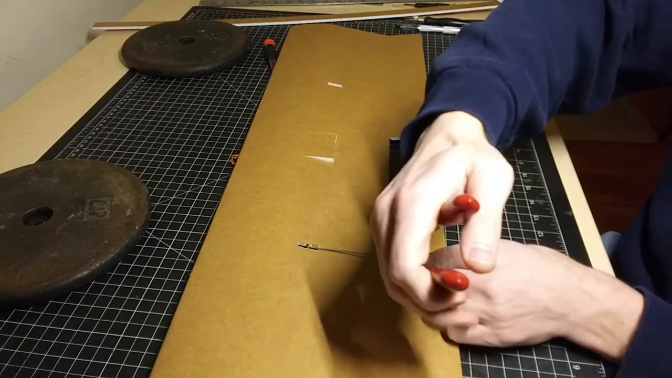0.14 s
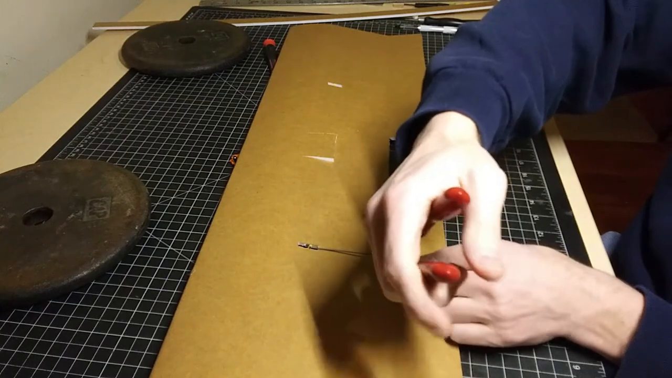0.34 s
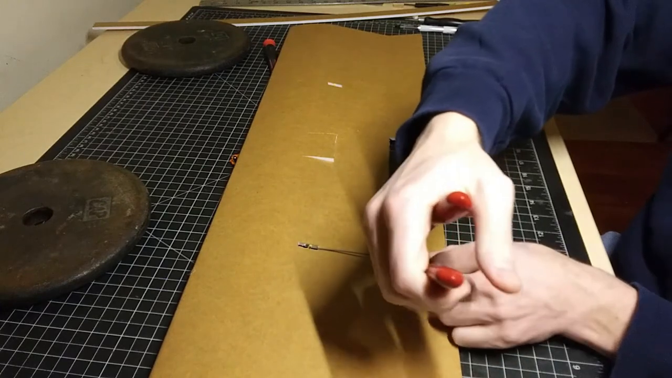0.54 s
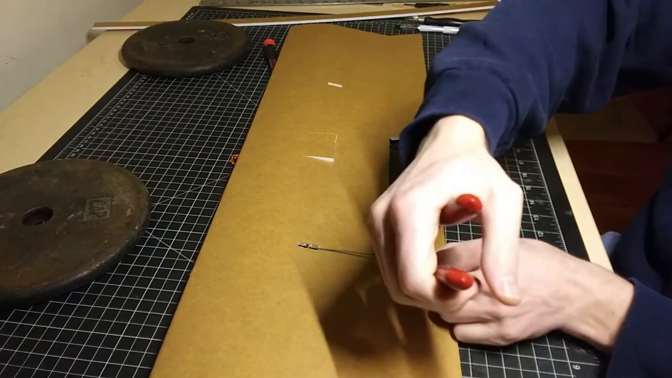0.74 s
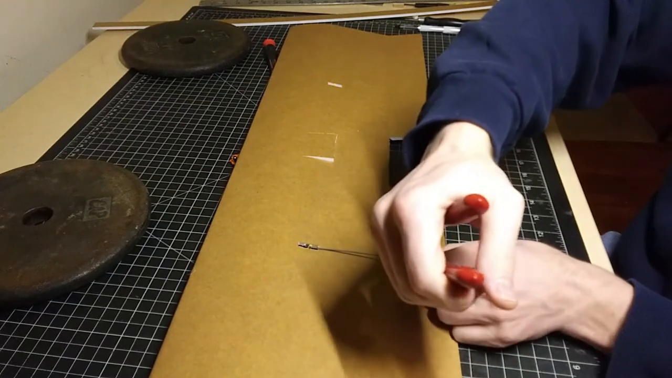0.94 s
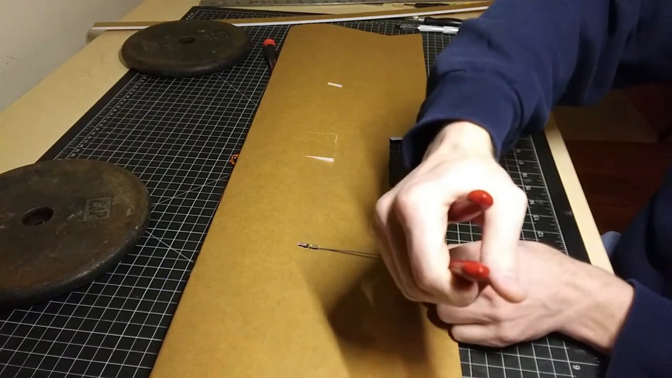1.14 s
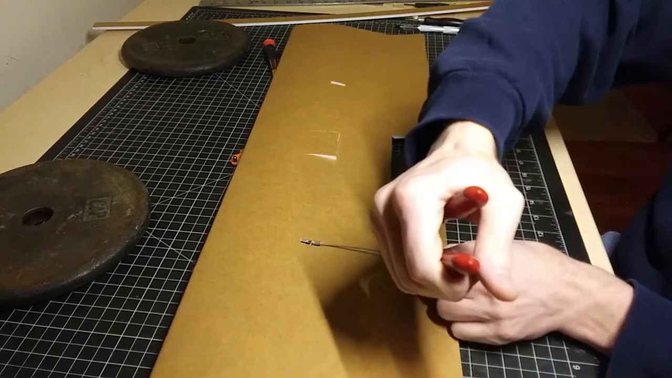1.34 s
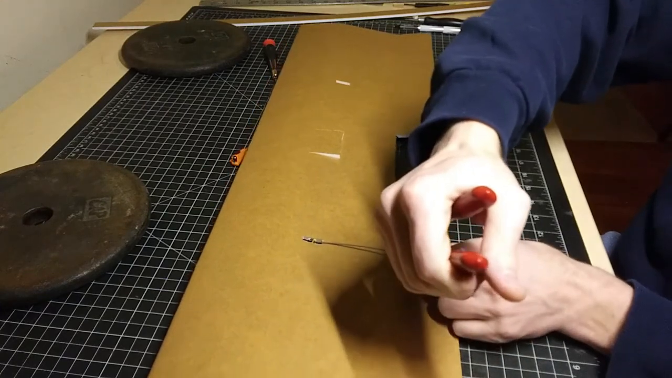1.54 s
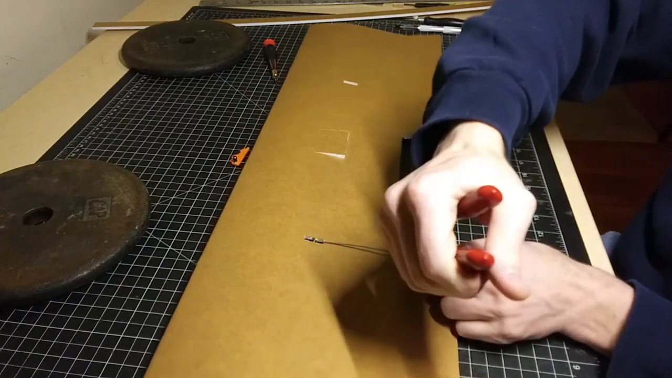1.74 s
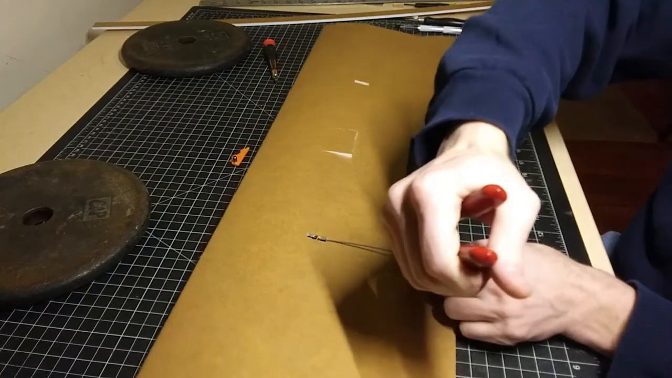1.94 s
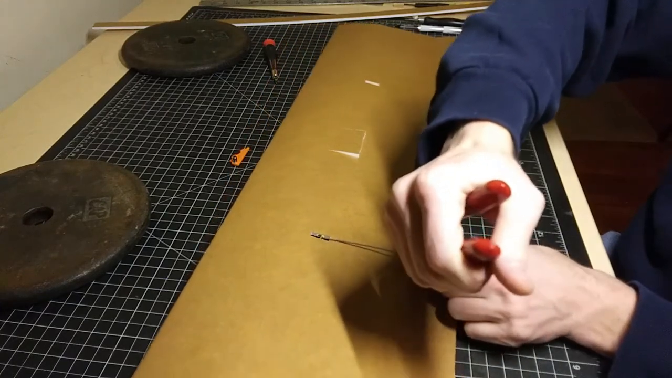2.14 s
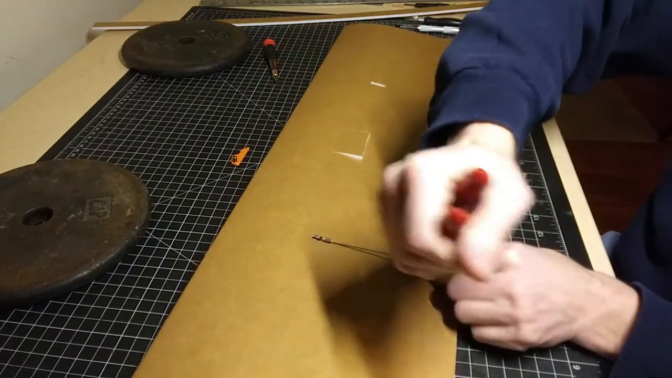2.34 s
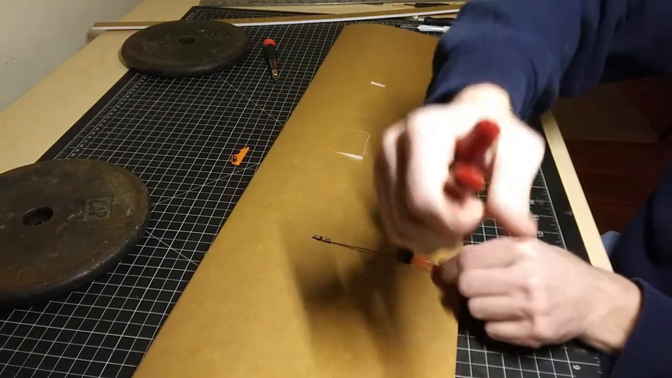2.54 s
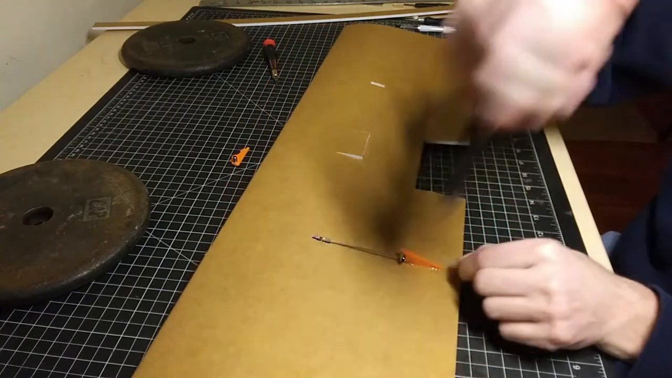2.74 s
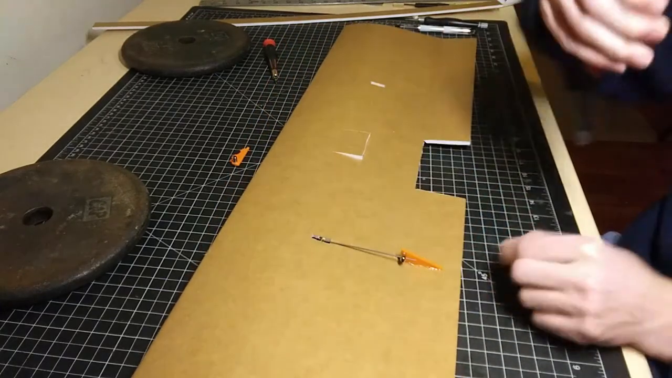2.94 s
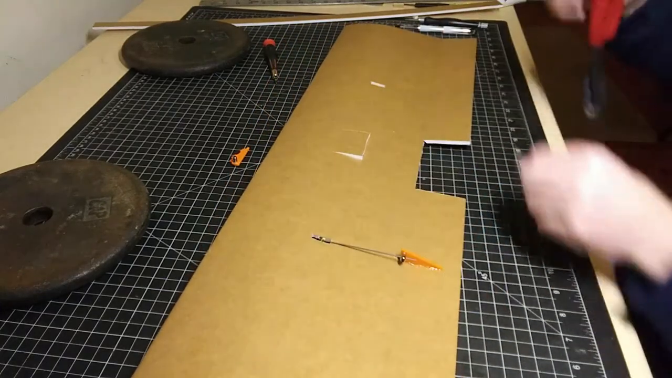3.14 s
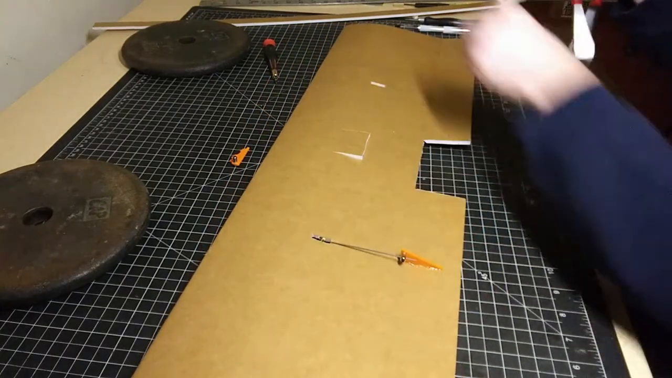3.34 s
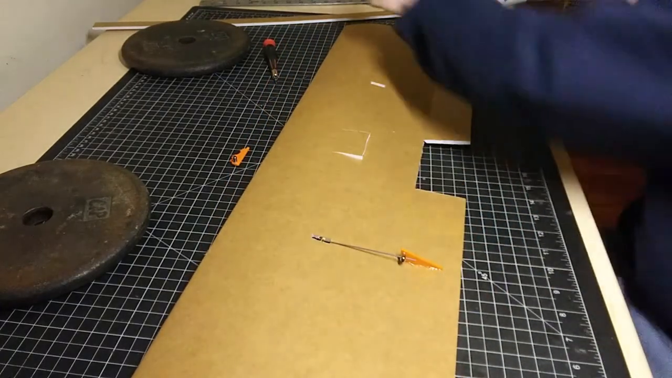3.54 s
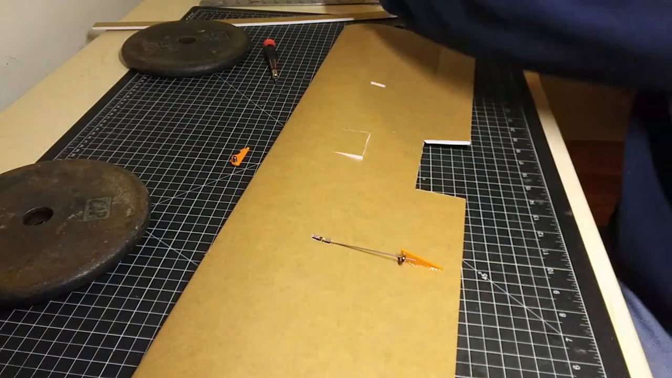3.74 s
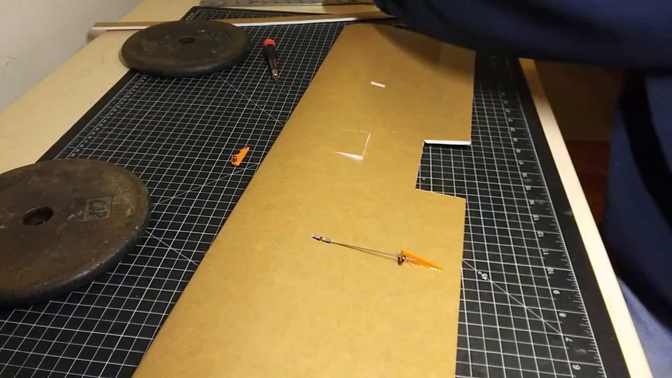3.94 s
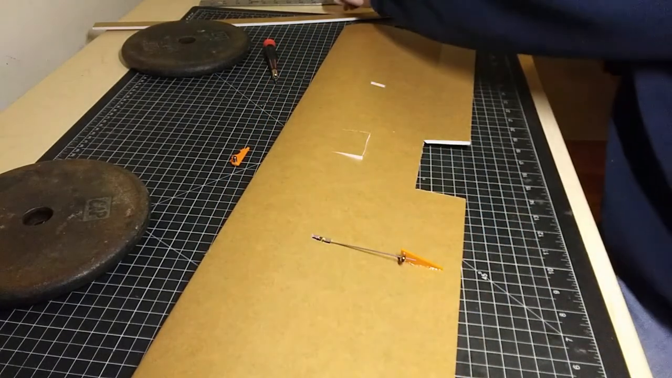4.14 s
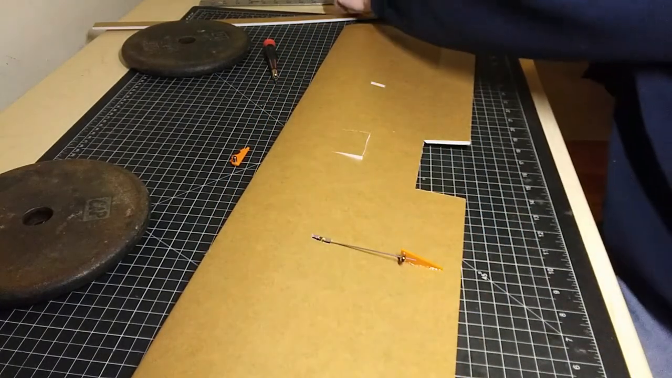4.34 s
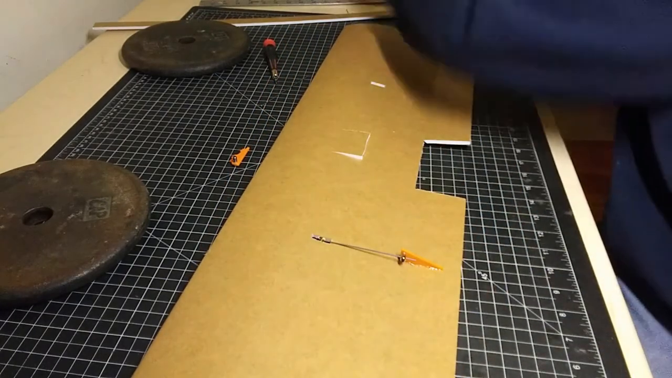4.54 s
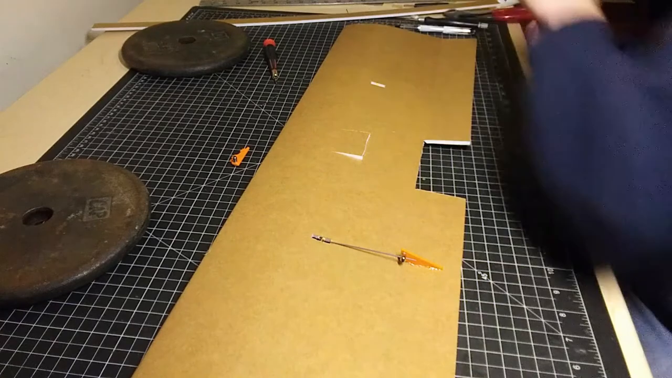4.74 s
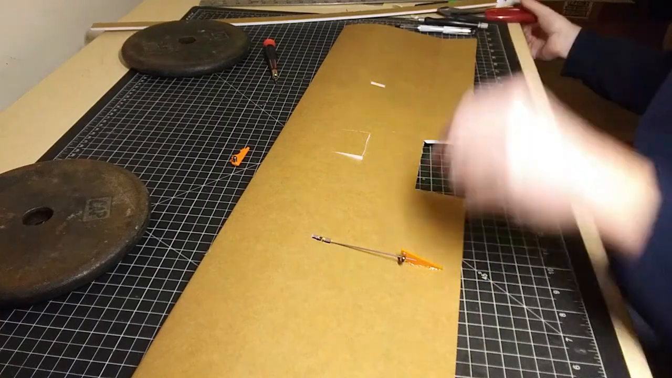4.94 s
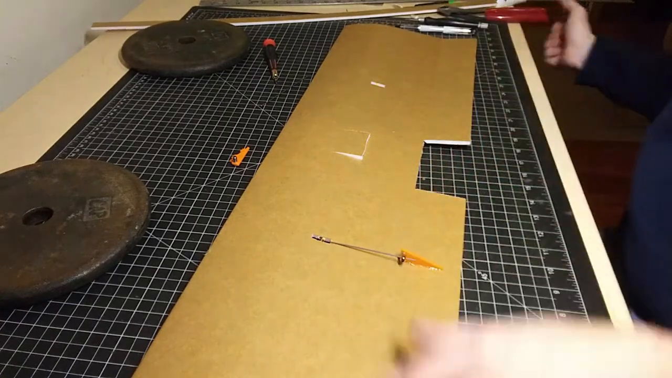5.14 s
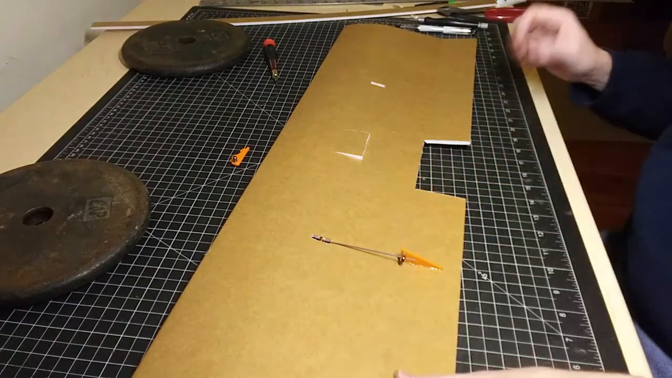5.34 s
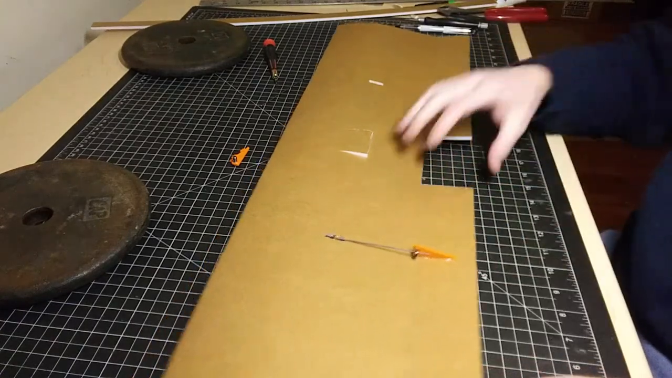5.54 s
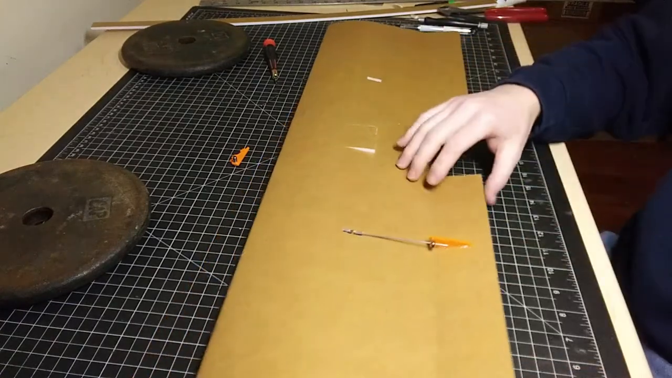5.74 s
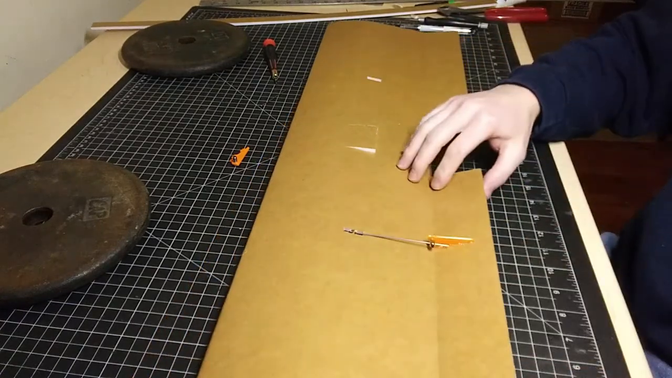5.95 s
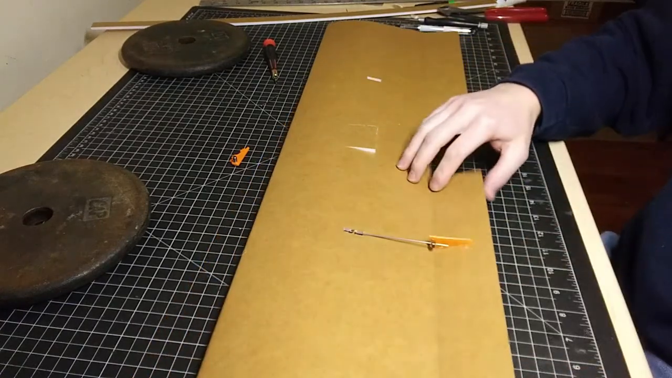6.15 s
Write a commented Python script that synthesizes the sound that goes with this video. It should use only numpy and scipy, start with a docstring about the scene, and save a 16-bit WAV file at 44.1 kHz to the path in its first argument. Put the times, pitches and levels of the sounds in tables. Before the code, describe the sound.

In a quiet room, cutters strain and crack sharply through thin wire, then are set down with a light knock before card scrapes softly.

```python
"""Over steady room noise and a low hum, sleeves and skin rub (grainy friction noise) and small taps and slips sound.
At 2.4 s wire cutters bite through a thin rod: fracture noise rings the steel jaws and blows ring mat and bench.
Near 4.3 s the loose pivot rattles and rings; at 4.8 s the tool lands on the far edge of the bench (decaying modes).
From 5.4 s a sheet of card slides over the mat: friction noise, narrow hisses and thin rising tones."""
import sys
import numpy as np
from scipy import signal
from scipy.fft import rfft, irfft
from scipy.io import wavfile
from scipy.ndimage import uniform_filter1d

SR = 44100
rng = np.random.default_rng(int(sys.argv[2]) if len(sys.argv) > 2 else 0)


def store_wav(level_fs):
    """Save 16-bit WAV to argv[1]."""
    pcm = np.round(np.clip(np.atleast_2d(level_fs), -1, 1) * 32767)
    wavfile.write(sys.argv[1], SR, pcm.T.astype(np.int16))


N = 272979  # length in samples

# Steady room noise. Each row: frequency in Hz, density in dB per Hz.
AIR_SPECTRUM = [(30, -50), (42, -14), (55, -5), (75, -2.5), (100, -12), (209, -10), (486, -18.5),
                (539, -21.5), (770, -26), (1220, -32.5), (2690, -41.5), (4980, -46), (8290, -45),
                (11000, -43), (15700, -52.5)]
AIR_DB = -64.5
# Low wavering lines. Each row: frequency in Hz, level in dB, depth of wavering as a fraction.
HUM_LINES = [(50.45, -61, 0.25), (74.4, -65.5, 0.36), (126.8, -76, 0.58), (180, -75, 0.94)]

# Sleeves and skin rubbing, one level curve. Each row: time in seconds, treble in dB, body in dB re treble.
RUB_LEVELS = [(0.0, -114, 2.5), (0.13, -92.5, 21), (0.24, -100, 6), (0.45, -84, 10), (0.5, -74.5, 4.5),
              (0.6, -79, 15), (0.66, -77.5, -8), (1.05, -83.5, -3), (1.14, -80, -2), (1.28, -94, 14),
              (1.36, -73.5, 5), (1.6, -78, 6), (2.05, -69, 3), (2.39, -77, 5.5), (2.75, -77, -3.5),
              (2.86, -75.5, -7), (2.99, -70, -10), (3.04, -77.5, -16.5), (3.35, -77, -8.5), (3.5, -71, -3),
              (3.75, -68, -3.5), (4.19, -77, -8.5), (4.25, -81, -9), (4.46, -78, 4.5), (4.55, -75.5, -6.5),
              (4.77, -73, 0.5), (4.9, -71, -15), (5.25, -84, -13), (5.42, -88.5, -13.5)]
# Friction spectra. Each row: frequency in Hz, density in dB per Hz.
RUB_TREBLE_SPECTRUM = [(2940, -22.5), (5000, -5.5), (9970, 0.5), (11900, -3.5), (14600, -7), (15700, -8.5)]
FRICTION_BODY_SPECTRUM = [(210, -47), (350, -6.5), (442, -1), (544, -9.5), (639, -3), (807, -2),
                          (1320, -5.5), (1810, -9), (3000, -20.5), (3900, -46), (6600, -120)]
FRICTION_MIDDLE_SPECTRUM = [(1800, -9), (2500, -5), (3100, -2), (4700, -6), (6000, -14.5)]
RUB_MIDDLE_DB, CARD_MIDDLE_DB = -6.5, 2  # re treble

# Small taps of handles, wire and fingers.
# Each row: start in seconds, body in dB, treble in dB re body, body frequency in Hz.
TAPS = [(0.147, -50.5, -15, 830), (0.169, -51, -9.5, 880), (0.264, -51.5, -19, 590), (0.365, -56, -14, 870),
        (0.449, -56.5, -12, 890), (0.5052, -47, -13, 650), (0.507, -52, -15, 1400),
        (0.553, -51.5, -10, 1170), (0.831, -51.5, -13.5, 920), (0.926, -52, -13, 910),
        (1.083, -48, -12, 874), (1.134, -51, -11, 950), (1.172, -49.5, -15, 871), (1.229, -55.5, -12, 910),
        (1.265, -56.5, -12, 830), (1.321, -51, -10, 1310), (2.039, -51, -22.5, 870), (2.137, -47, -11, 750),
        (2.328, -50, -26, 766.8), (4.663, -57, -9, 602.5), (4.73, -54.5, -7, 620.7),
        (5.895, -53.5, -0.5, 1076)]
TAP_T60 = 0.029  # s
# Bright part of a tap. Each row: frequency in Hz, density in dB per Hz.
TAP_TREBLE_SPECTRUM = [(1500, -24), (2400, -3.5), (3300, -8), (4300, -4), (7000, -4.5), (12000, -8.5),
                       (16000, -20)]
# The taps of a quick run. In order: body in dB, treble in dB re body, body frequency in Hz, t60 in seconds.
SCRAPE_TAP = (-41, -20, 1050, .014)
SCRAPE_S, SCRAPE_LENGTH_S, SCRAPE_GAP_S = .5735, .04, .004
SCRAPE_FALL_DB, SCRAPE_SPREAD_OCTAVES = -4.5, 0.585

# Brief bright slips and clicks. Each row: start in seconds, level in dB, centre frequency in Hz.
SLIPS = [(0.177, -62, 6800), (0.2652, -59.5, 7050), (0.603, -63, 9000), (0.838, -69, 4300),
         (1.2694, -65, 9540), (1.35, -57.5, 4200), (1.6174, -60, 10400), (2.2321, -53.5, 6874),
         (2.7394, -68, 5900), (3.2594, -66, 7080), (3.3259, -53.5, 7000), (4.794, -40.5, 10100),
         (5.0194, -57, 10400), (5.5067, -49, 9120), (5.5304, -43.5, 9270), (5.5422, -44, 9420),
         (5.5717, -46, 9150), (5.5844, -47, 7250), (5.5926, -45, 7300), (5.633, -48, 9817),
         (5.8948, -54.5, 3470), (6.1714, -55.5, 10100)]
SLIP_T60 = 0.012  # s
# Softer, longer bursts of bright noise: rustles of grip and card, and the hiss after the landing.
# Each row: start in seconds, level in dB, centre frequency in Hz.
PUFFS = [(0.477, -65.5, 9200), (1.3144, -73, 10700), (1.349, -65, 8440), (1.3787, -58, 12500),
         (1.4294, -66, 12600), (1.5294, -61, 12500), (1.6904, -59, 9900), (1.8096, -68, 9800),
         (1.874, -58.5, 13700), (1.9139, -68, 9250), (1.9692, -56, 13700), (2.0493, -62, 13900),
         (2.1364, -60.5, 13330), (2.3298, -63, 10000), (4.797, -52, 10020), (5.455, -59.5, 11190),
         (5.69, -51, 10000), (5.72, -61, 10200), (5.9588, -67, 9710)]
PUFF_T60 = 0.11  # s

# Narrow hisses and squeaks of strained grip and sliding card.
# Each row: start in seconds, length in seconds, first Hz, last Hz, level in dB, width in Hz.
WHISTLES = [(0.681, 0.39, 8100, 8280, -83, 800), (1.597, 0.76, 4810, 4760, -87, 700),
            (1.95, 0.38, 7936, 7780, -77.5, 550), (5.454, 0.026, 2890, 2900, -69.5, 250),
            (5.51, 0.26, 1002, 1205, -64, 500), (5.62, .06, 675, 420, -61.5, 59.73),
            (5.838, 0.067, 3320, 3207, -72.5, 550), (5.945, .085, 1270, 840, -69, 120)]

# Blows beside the jaws, where mat and card lie on the bench.
# Each row: start in seconds, level in dB, centre of the force spectrum in Hz, room share in dB.
CUT_BLOWS = [(2.232, -38, 694, -11.5), (2.4014, -7.5, 1080, -11.5), (2.4034, -10, 1000, -8.5),
             (2.411, -21, 1210, -7)]
# Modes of bench under mat. Each row: frequency in Hz, level in dB, t60 in seconds.
MAT_MODES = [(324.7, -12.5, 0.028), (460, -11.5, 0.019), (561, -9.5, .02), (700, -1, 0.026),
             (967, -3, 0.027), (1120, -2.5, 0.026), (1230, 0, 0.036), (1503, -3, 0.025), (2160, -14, 0.018)]
# Low damped modes of bench thuds; four of them ring together in the thud of the cut.
# Each row: start in seconds, level in dB, frequency in Hz, t60 in seconds, rise in seconds.
THUD_MODES = [(2.4017, -20.5, 63.2, 0.08, 0.00226), (2.4023, -16.5, 100, 0.047, 0.00092),
              (2.402, -17, 150, .03, 0.00093), (2.4022, -23, 208, 0.022, .001),
              (2.233, -42, 342, 0.038, 0.00073), (3.604, -32, 70.6, 0.105, 0.0036),
              (3.729, -37, 130, 0.05, 0.0045)]

# The jaws break through and rebound. Each row: start in seconds, level in dB, t60 in seconds.
CRACKS = [(2.4004, -0.5, 0.029), (2.4038, -1, 0.015), (2.4094, -15.5, .02), (2.4123, -7.5, .012),
          (2.427, -9.5, 0.024)]
# Fracture noise. Each row: frequency in Hz, density in dB per Hz.
CRACK_SPECTRUM = [(900, -45), (1700, -16.5), (3000, -21.5), (4700, -19), (5150, -27), (5650, -9.5),
                  (6500, -11.5), (7100, -12), (7800, -1.5), (8800, -11), (9700, -6), (11000, -11),
                  (12500, -7.5), (14000, -15.5), (15800, -25)]
# Modes of the steel jaws. Each row: frequency in Hz, relative level in dB, t60 in seconds.
JAW_MODES = [(7420, -4, 0.017), (8330, -3.5, 0.015), (7300, -0.5, 0.059), (9567, -9, .012)]

# The loose pivot of the cutters rattles.
# Each row: start in seconds, click in dB, ring in dB re click, t60 of the click in seconds.
RATTLE = [(4.261, -53, -16.5, 0.036), (4.2737, -49, -10, 0.034), (4.2833, -52.5, -12, 0.04),
          (4.3258, -56, -15, 0.043), (4.3564, -53, -12.5, 0.043), (4.3916, -55.5, -2.5, 0.04),
          (4.424, -61, -4.5, 0.05), (4.4405, -30.5, -30, 0.0045), (4.443, -59, -10, 0.038)]
PIVOT_HZ, PIVOT_T60 = 10250, 0.49  # Hz, s
PIVOT_HELD_S = 4.452  # the grip stills the ring

# The cutters land on the far edge of the bench.
# Each row: start in seconds, level in dB, centre of the force spectrum in Hz, room share in dB.
LANDING_BLOWS = [(4.785, -44, 1414, 7.5), (4.7938, -21, 553.6, -3.5), (4.7971, -20.5, 964, -3),
                 (4.8011, -25.5, 496, 2.5)]
# Modes of the bench edge. Each row: frequency in Hz, level in dB, t60 in seconds.
BENCH_MODES = [(109.8, -7, 0.46), (131.7, -4.5, 0.68), (185, -12, 0.43), (254, -19, 0.17),
               (310.5, -17, 0.31), (411, -12, 0.04), (554.4, -7, 0.031), (646, -3.5, 0.022),
               (888, -2.5, 0.02), (1103, -1, 0.017), (1284, 2.5, 0.0083), (1790, -10.5, 0.0081),
               (2058, -4, 0.0076), (2690, -11.5, 0.00535), (3232, -4, 0.0077)]
# Steel rings once laid down. Each row: start in seconds, level in dB, frequency in Hz, t60 in seconds.
LAID_RING = [(4.801, -54, 9830, 0.11), (4.826, -60, 9678, 0.123)]

# Card sliding over the mat. Each row: time in seconds, treble in dB, body in dB re treble.
CARD_LEVELS = [(5.445, -88, -7.5), (5.46, -74.5, 2), (5.528, -76, 10), (5.62, -66, 3.5), (5.752, -67, 7.5),
               (5.878, -71.5, 1), (5.92, -77.5, 2), (5.974, -73, 5), (6.054, -78, 4.5), (6.19, -73.5, 6)]
# Treble of the card. Each row: frequency in Hz, density in dB per Hz.
CARD_TREBLE_SPECTRUM = [(2940, -34.5), (5000, -11), (5400, -1), (6930, 6.5), (8470, 1), (10700, 3.5),
                        (12800, -13.5), (15700, -24)]
# Thin rising tones of the card. Each row: start in seconds, length in seconds, first Hz, last Hz, level in dB.
SQUEAKS = [(5.98, .23, 8950, 10000, -79), (5.98, .17, 7900, 8300, -80)]

# Decay of the room. Each row: frequency in Hz, t60 in seconds.
ROOM_T60 = [(60, 0.39), (250, .36), (1000, .33), (1600, 0.37), (4000, 0.36), (7000, 0.32), (12000, .22),
            (15500, .15)]
FIRST_WALL_S, ROOM_DB = 0.0033, -10
LATE_DB, LATE_STRETCH = -15.5, 1.6  # a weaker, slower decay from the rest of the house
EDGE_HZ = 15865  # upper band limit


def gain_of(db):
    """Level in decibels expressed as an amplitude ratio."""
    return 10 ** (np.asarray(db) / 20)


def evened(x):
    """Normalisation to unit rms."""
    return x / np.sqrt(np.mean(abs(x) ** 2) + 1e-20)


def read(points, hz):
    """Linear interpolation of a table on a logarithmic frequency axis."""
    f, value = np.transpose(points)
    return np.interp(np.log(hz + 1), np.log(f + 1), value)


def add(mix, s, sound):
    """Superposition: a sound is summed into the mix at a time in seconds."""
    part = mix[round(s * SR):][:len(sound)]
    part += sound[:len(part)]


def noise(points, size):
    """Spectral shaping: white noise filtered to a given spectrum, at unit rms."""
    hz = np.fft.rfftfreq(size, 1 / SR)
    return evened(irfft(rfft(rng.standard_normal(size)) * gain_of(read(points, hz)), size))


def fade(t60, rise=0.00044):
    """Exponential decay of a damped system after a quick exponential rise."""
    t = np.arange(round(abs(t60) * SR) + 20) / SR
    return t, (1 - np.exp(-t / rise)) * gain_of(-60 * t / abs(t60))


def ring(hz, t60, rise=.0003):
    """Damped harmonic oscillation of one mode."""
    t, shape = fade(t60, rise)
    return shape * np.sin(2 * np.pi * hz * t)


def click(points):
    """Minimum-phase impulse: the causal pulse of a given spectrum, with unit energy."""
    log_gain = np.log(gain_of(read(points, abs(np.fft.fftfreq(4096, 1 / SR)))))
    phase = -signal.hilbert(log_gain).imag
    x = np.fft.ifft(np.exp(log_gain + 1j * phase)).real[:2048]
    return x / np.linalg.norm(x)


def room(x):
    """Reverberation: dense reflections of random sign, each band decaying at its own rate, drawn afresh per call."""
    reflections = rng.choice([-1., 1.], SR // 2) * (np.arange(SR // 2) > FIRST_WALL_S * SR)
    hz, t, z = signal.stft(reflections, SR, nperseg=256)
    fall_db = -60 * t / read(ROOM_T60, hz)[:, None]
    decay = np.hypot(gain_of(fall_db), gain_of(LATE_DB + fall_db / LATE_STRETCH))
    tail = signal.istft(z * decay, SR, nperseg=256)[1]
    return signal.fftconvolve(x, tail / np.linalg.norm(tail))[:N]


def air():
    """Stationary noise: random pressure of fixed spectrum fills the room."""
    return gain_of(AIR_DB) * noise(AIR_SPECTRUM, N)


def hum():
    """Slow modulation: low sinusoids waver in amplitude and phase."""
    out, t = np.zeros(N), np.arange(N) / SR
    for hz, db, depth in HUM_LINES:
        slow = depth * noise([(0, 1), (2.5, -1.5), (8, -27.5), (30, -100)], N)
        phase = 2 * np.pi * (hz * t + rng.random()) + slow[::-1]
        out += gain_of(db) * evened((1 + slow) * np.sin(phase))
    return out


def friction(rows, treble_spectrum, middle_db):
    """Dry friction: fibres catch unevenly, so the level of the noise flickers."""
    out = np.zeros(N)
    s, treble_db, body_db = np.transpose(rows)
    t = np.arange(s[0], s[-1], 1 / SR)
    slow = uniform_filter1d(uniform_filter1d(rng.standard_normal(len(t)), 300), 300)
    catch = evened(gain_of(1.7 * evened(slow)))  # flicker of 1.7 dB rms
    body = gain_of(np.interp(t, s, body_db)) * noise(FRICTION_BODY_SPECTRUM, len(t))
    middle = gain_of(middle_db) * noise(FRICTION_MIDDLE_SPECTRUM, len(t))
    treble = noise(treble_spectrum, len(t))
    add(out, s[0], gain_of(np.interp(t, s, treble_db)) * catch * (treble + body + middle))
    return out


def rubbing():
    """Friction of sleeves and skin, following one level curve."""
    return friction(RUB_LEVELS, RUB_TREBLE_SPECTRUM, RUB_MIDDLE_DB)


def scrape():
    """Repeated impact: a run of taps at uneven short gaps, fading, with scattered pitch."""
    rows = []
    body_db, treble_db, body_hz, t60 = SCRAPE_TAP
    for s in np.arange(0, SCRAPE_LENGTH_S, SCRAPE_GAP_S):
        delay, pitch = rng.uniform(-1, 1, 2)
        start = SCRAPE_S + s + abs(delay) * s / 10
        db = body_db + SCRAPE_FALL_DB * s / SCRAPE_LENGTH_S
        rows.append((start, db, treble_db, body_hz * 2 ** (SCRAPE_SPREAD_OCTAVES * pitch), t60))
    return rows


def taps():
    """Impact on a small hollow: a damped resonance with short noise of body and edge."""
    out = np.zeros(N)
    for s, db, treble_db, hz, t60 in [(*row, TAP_T60) for row in TAPS] + scrape():
        t, shape = fade(t60, rise=0.0012)
        body_spectrum = [(hz / 2.8, -24), (hz, 0), (hz * 2.0, -8), (hz * 3, -24), (hz * 6, -50)]
        body = noise(body_spectrum, 4096)[:len(t)]
        edge = gain_of(treble_db) * noise(TAP_TREBLE_SPECTRUM, 4096)[:len(t)]
        resonance = 1.2 * ring(hz, t60, rise=.001)
        add(out, s, gain_of(db) * (resonance + shape * (0.35 * body + edge)))
    return out


def slips_and_puffs():
    """Transient noise: decaying bursts about a centre frequency, short for slips and clicks, longer for puffs."""
    out = np.zeros(N)
    for s, db, hz, t60 in [(*row, SLIP_T60) for row in SLIPS] + [(*row, PUFF_T60) for row in PUFFS]:
        t, shape = fade(t60, rise=t60 * 0.041)  # longer bursts swell more slowly
        below = [(1500, -40), (hz / 2.2, -18), (hz / 1.4, -6)]
        above = [(hz, 0), (hz * 1.3, -8), (hz * 1.9, -24)]
        add(out, s, gain_of(db) * shape * noise(below + above, len(t)))
    return out


def hisses():
    """Quadrature modulation: two slow noises on a gliding carrier make a narrow hiss about its pitch."""
    out = np.zeros(N)
    for s, length, from_hz, to_hz, db, width in WHISTLES:
        size = round(length * SR)
        band = [(0, 0), (width / 2, -3), (width * 1.5, -25), (width * 6, -70)]
        phase = 2 * np.pi * np.cumsum(np.linspace(from_hz, to_hz, size)) / SR
        hiss = noise(band, size) * np.sin(phase) + noise(band, size) * np.cos(phase)
        add(out, s, gain_of(db) * hiss * signal.windows.tukey(size, .4))
    return out


def blow(modes, db, centre_hz, room_db):
    """Modal excitation: modes near the centre of the force spectrum ring most, neighbours in opposite sense."""
    sound = np.zeros(SR)
    for k, (hz, mode_db, t60) in enumerate(modes):
        off_db = -4.5 * np.log2(hz / centre_hz) ** 2
        add(sound, 0, (-1) ** k * gain_of(db + mode_db + off_db) * ring(hz, t60, rise=0.00021))
    return sound + gain_of(room_db) * room(sound)[:SR]


def bench():
    """Structural vibration: blows ring the modes of mat and bench edge; thuds are low damped modes."""
    out = np.zeros(N)
    for modes, blows in [(MAT_MODES, CUT_BLOWS), (BENCH_MODES, LANDING_BLOWS)]:
        for s, *force in blows:
            add(out, s, blow(modes, *force))
    for s, db, hz, t60, rise in THUD_MODES:
        add(out, s, gain_of(db) * ring(hz, t60, rise))
    return out


def snap():
    """Brittle fracture: bursts of noise ring the jaws, and the room blends each into one smooth colour."""
    out = np.zeros(N)
    for s, db, t60 in CRACKS:
        t, shape = fade(t60, rise=0.00018)
        add(out, s, gain_of(db) * shape * noise(CRACK_SPECTRUM, len(t)))
        burst_size = np.linalg.norm(shape)  # root of the burst's energy
        add(out, s, gain_of(db - 7.5) * burst_size * room(click(CRACK_SPECTRUM)))
        for hz, mode_db, ring_t60 in JAW_MODES:
            start = s + rng.uniform(0, 0.00023)
            add(out, start, gain_of(db + mode_db - 15.0) * ring(hz, ring_t60))
    return out


def rattle():
    """Impact in a loose joint: each click of the pivot rings the steel at one pitch until the grip stills it."""
    out = np.zeros(N)
    tick_spectrum = [(500, -2.5), (1700, 3.5), (3500, -6.5), (7000, -2.0), (11000, 5), (16000, -5.5)]
    for s, db, ring_db, t60 in RATTLE:
        t, shape = fade(t60)
        add(out, s, gain_of(db) * shape * noise(tick_spectrum, len(t)))
        steel = ring(PIVOT_HZ, PIVOT_T60, rise=0.0025)
        free = np.clip((PIVOT_HELD_S - s - np.arange(len(steel)) / SR) / .008, 0, 1)
        add(out, s, gain_of(db + ring_db) * steel * free)
    return out


def laid_ring():
    """Free vibration: the steel rings on once laid down."""
    out = np.zeros(N)
    for s, db, hz, t60 in LAID_RING:
        add(out, s, gain_of(db) * ring(hz, t60, rise=0.0022))
    return out


def card():
    """Friction of card sliding over the mat, following one level curve."""
    return friction(CARD_LEVELS, CARD_TREBLE_SPECTRUM, CARD_MIDDLE_DB)


def squeaks():
    """Frequency modulation: thin rising tones of the card waver in pitch and level."""
    out = np.zeros(N)
    for s, length, from_hz, to_hz, db in SQUEAKS:
        size = round(length * SR)
        waver = noise([(0, 0), (12, -2), (40, -30), (200, -80)], size)
        pitch_hz = np.linspace(from_hz, to_hz, size) + 60 * waver
        tone = np.sin(2 * np.pi * np.cumsum(pitch_hz) / SR)
        add(out, s, gain_of(db + 3 * waver[::-1]) * tone * signal.windows.tukey(size, .2))
    return out


def scene():
    """Superposition of all sources; the handling sounds also excite the room."""
    hands = taps() + slips_and_puffs() + rattle() + laid_ring()
    handling = hands + gain_of(ROOM_DB) * room(hands)
    sliding = rubbing() + hisses() + card() + squeaks()
    return (air() + hum() + sliding + handling + bench() + snap())[None]


def record(dry):
    """Transduction: the microphone loses the deepest bass, the snap overloads the input, the band is limited."""
    miked = signal.sosfilt(signal.butter(4, 42, "highpass", fs=SR, output="sos"), dry)
    clipped = np.clip(miked, -.95, .95)
    band_limit = signal.firwin(511, EDGE_HZ, window=("kaiser", 9), fs=SR)
    return signal.oaconvolve(clipped, band_limit[None], "same")


dry = scene()
out = record(dry)
store_wav(out)
```